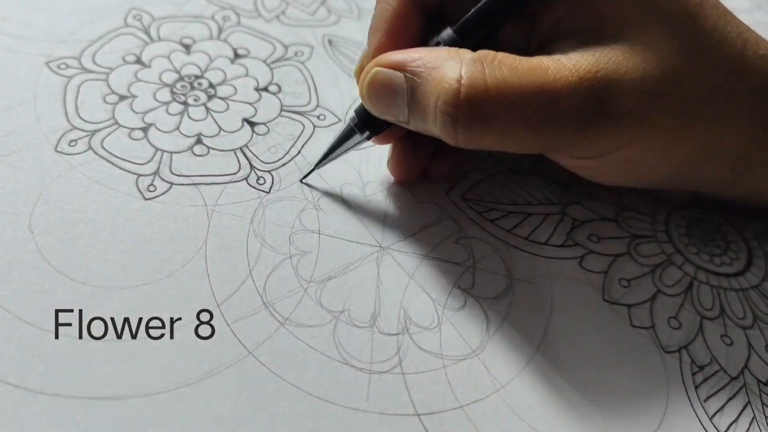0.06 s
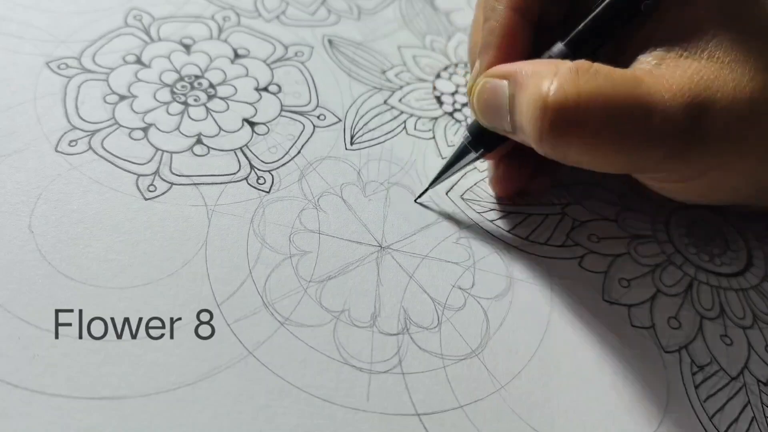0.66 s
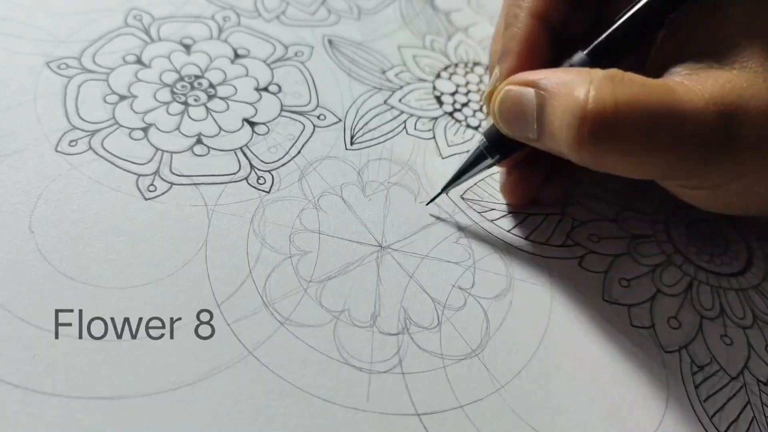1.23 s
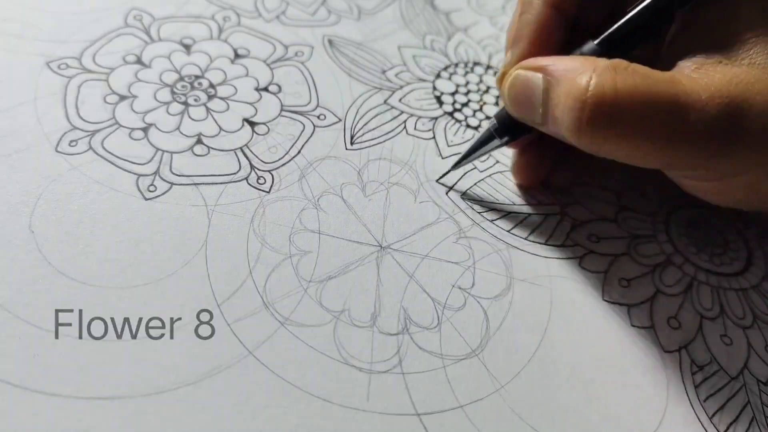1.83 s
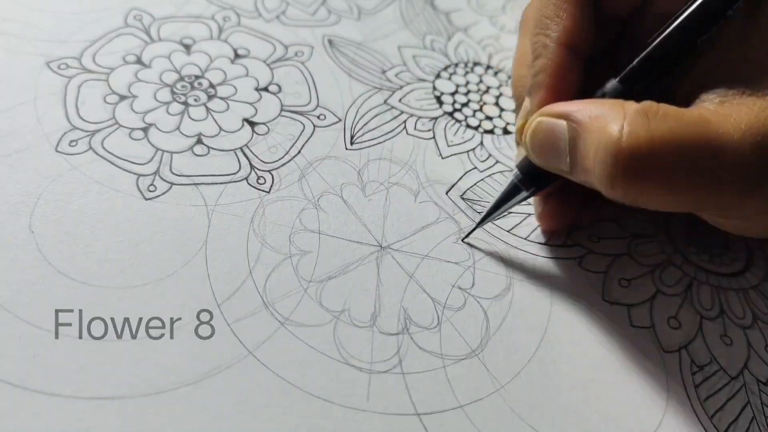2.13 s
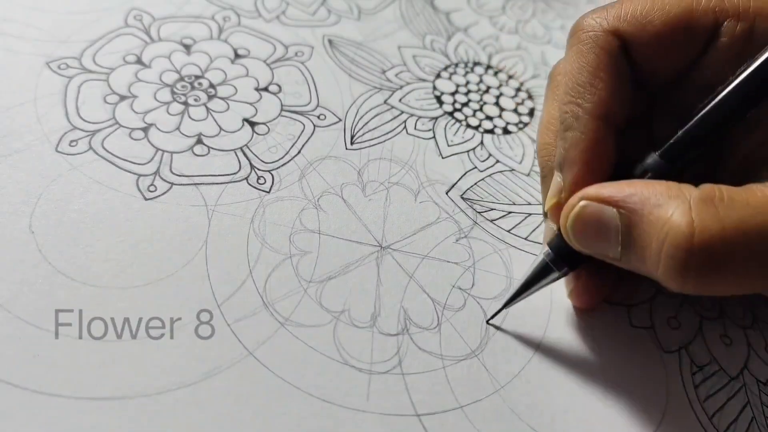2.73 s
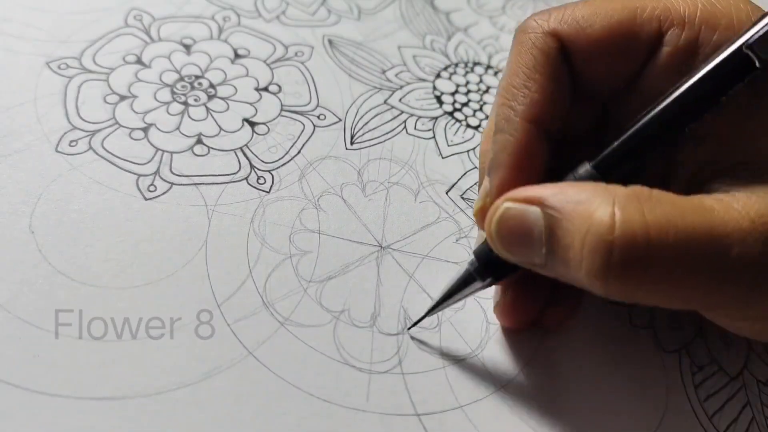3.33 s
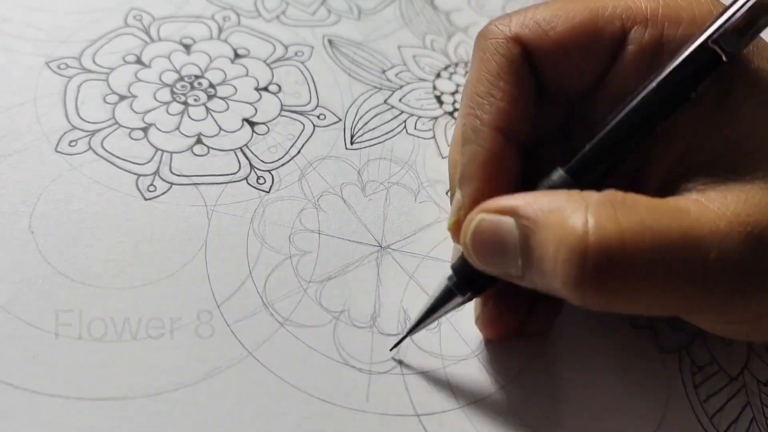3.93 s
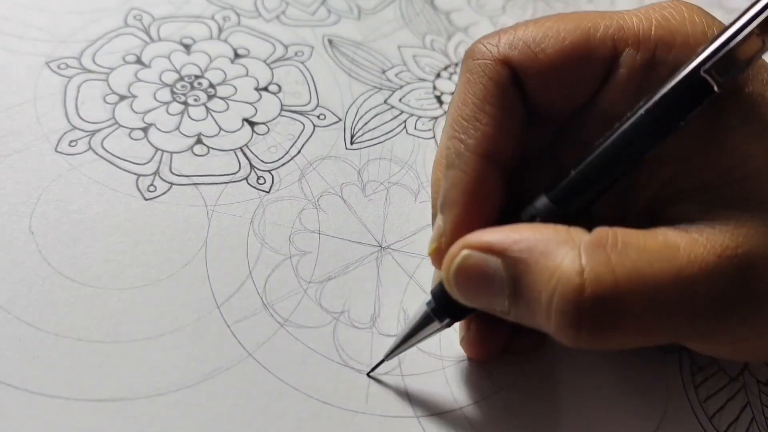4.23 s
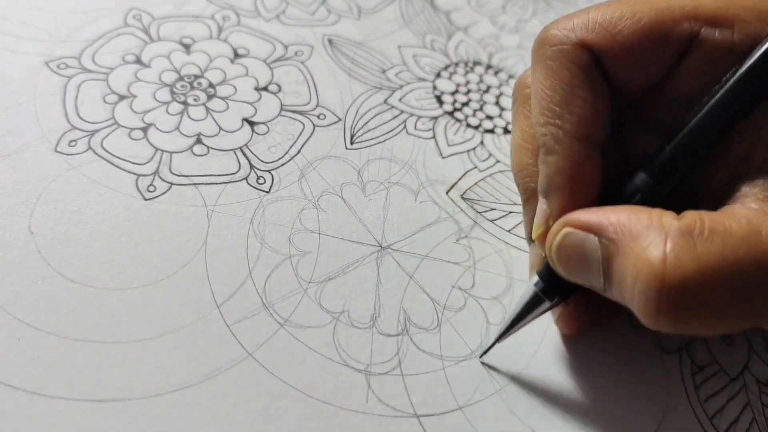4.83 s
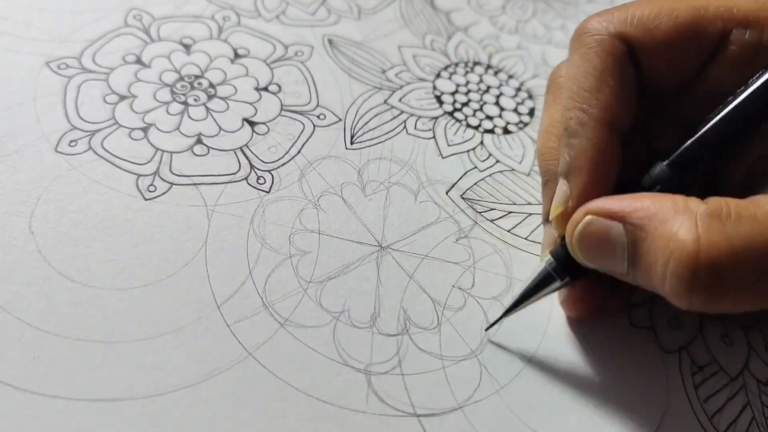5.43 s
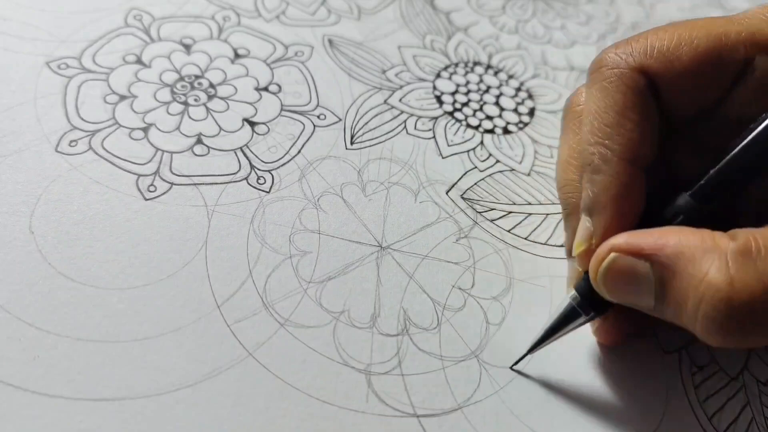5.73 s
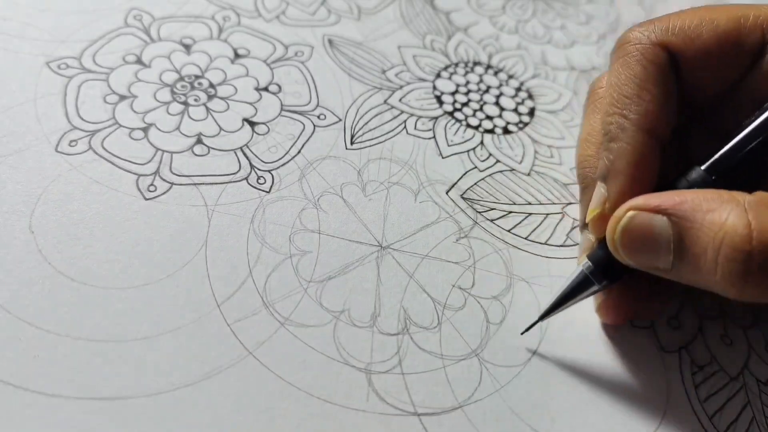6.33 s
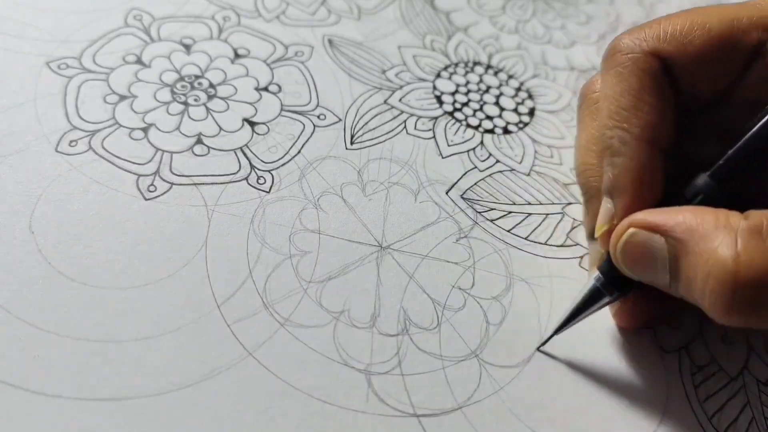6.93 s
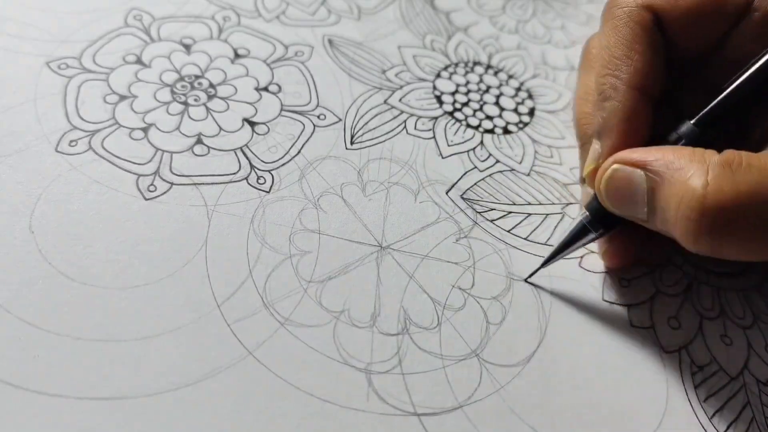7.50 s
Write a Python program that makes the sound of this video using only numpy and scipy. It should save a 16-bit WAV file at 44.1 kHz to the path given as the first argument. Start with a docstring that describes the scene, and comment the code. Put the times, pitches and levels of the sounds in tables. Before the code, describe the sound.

A fine pen scratches short strokes on paper, with soft hand brushes and bumps, over a steady low fan hum.

```python
"""In a small room, close up, a fine pen sketches petal outlines on paper in short, separate strokes.
The tip rasps over the paper's fibres and gives one sharp tick. The hand slides across the sheet,
squeaks faintly, judders once as it sticks and slips, and bumps softly on the pad and the desk below.
Underneath, a fan hums near 100 Hz, with faint room hiss and a thin electrical whine far above."""
import sys
import numpy as np
from scipy import signal
from scipy.fft import rfft, irfft, next_fast_len
from scipy.io import wavfile
from scipy.ndimage import uniform_filter1d, map_coordinates

SR = 44100
rng = np.random.default_rng(int(sys.argv[2]) if len(sys.argv) > 2 else 0)


def persist_wave(psi):
    """Save psi, clipped to +-1, as 16-bit WAV."""
    counts = np.round(np.clip(psi, -1, 1) * 32767).astype(np.int16)
    wavfile.write(sys.argv[1], SR, np.atleast_2d(counts).T)


N = 337806

# The pen strokes. Each row: time of reaching full speed, rise, hold and fall in seconds,
# rasp level in dB, extra bite of the tip in dB.
STROKES = [(0.492, 0.034, 0.017, 0.034, -56.5, 3), (1.455, 0.077, 0.022, 0.042, -56, 1.5),
           (2.665, 0.023, 0.066, 0.034, -55, -1), (3.388, 0.032, 0.012, 0.073, -58, -1.5),
           (3.991, 0.036, 0.016, 0.044, -58.5, 0), (4.989, 0.135, 0.044, 0.033, -64.3, -0.5),
           (5.242, 0.053, 0.012, 0.09, -65, -2), (5.639, 0.095, 0.022, 0.042, -54.2, 0.5),
           (6.029, 0.068, 0.008, 0.065, -63, -1.5), (6.306, 0.069, 0.012, 0.043, -65, -1.5),
           (6.524, 0.035, 0.016, 0.056, -60, 1), (7.142, 0.05, 0.031, 0.089, -64.5, -1.5),
           (7.444, 0.043, 0.008, 0.03, -64, -0.5), (7.528, 0.023, 0.011, 0.031, -60.5, -3)]


def amp(db):
    """Decibels to gain."""
    return 10 ** (np.asarray(db) / 20)


def unit(x):
    """Scale to rms 1."""
    return x / np.sqrt(np.mean(x ** 2) + 1e-20)


def clock():
    """The time of every sample, in seconds."""
    return np.arange(N) / SR


def wobble(rate):
    """A smooth random curve with rate knots a second."""
    knots = rng.standard_normal(int(N * rate / SR) + 4)
    return map_coordinates(knots, [np.arange(N) * rate / SR])


def swell(at, rise, fall, hold=0):
    """Speed of one gesture: 1 during the hold, on bell flanks 10 dB down at rise and fall seconds."""
    age = clock() - at
    away = np.maximum(np.maximum(-age / rise, (age - hold) / fall), 0)
    return amp(-10 * np.minimum(away ** 2, 20))


def filtered(x, response):
    """Filter x by a gain given as a function of frequency in Hz."""
    size = next_fast_len(N + 8192)
    return irfft(rfft(x, size) * response(np.fft.rfftfreq(size, 1 / SR)), size)[..., :N]


def coloured(x, points):
    """EQ x with a curve of (Hz, dB) points on a log frequency axis."""
    freqs, db = np.transpose(points)
    return filtered(x, lambda hz: amp(np.interp(np.log(hz + 1), np.log(freqs), db)))


def patchy(x, depth_db):
    """Make the timbre shimmer with random gain patches, a few hundred Hz wide and some 50 ms long."""
    spectra = signal.stft(x, nperseg=512)[2]
    patches = uniform_filter1d(rng.standard_normal(spectra.shape[1:]), size=3, axis=0)
    patches = uniform_filter1d(patches, size=10, axis=1)
    return signal.istft(spectra * amp(depth_db * unit(patches)), nperseg=512)[1][:, :N]


def narrow_noise(pitch_hz, width_hz):
    """Noise of rms 1 in a narrow band that follows a pitch."""
    phase = 2 * np.pi * np.cumsum(pitch_hz * np.ones(N)) / SR
    return unit(wobble(width_hz) * np.cos(phase) + wobble(width_hz) * np.sin(phase))


def panned(x, left_db):
    """Pan a stereo pair so that the left gains left_db over the right."""
    return x * amp([[left_db / 2], [-left_db / 2]])


def leaning(x):
    """The drawing lies to the left, so the right ear hears less of it, above all in the high treble."""
    # The stereo tilt. Each row: frequency in Hz, left over right in dB.
    tilt = [(700, 4), (1300, 1.5), (2400, 2.5), (4400, 1.5), (8000, 0.5), (10000, 4), (11500, 5),
            (13500, 2.5), (15000, 3)]
    freqs, db = np.transpose(tilt)
    return filtered(x, lambda hz: amp(np.interp(hz, freqs, db) * np.array([[.5], [-.5]])))


def air():
    """Faint room hiss, different at each ear, and a thin electrical whine."""
    # The colour of the hiss. Each row: frequency in Hz, gain in dB.
    hiss_eq = [(200, -42), (380, 9.5), (550, 9.5), (850, 5), (1200, -1), (2000, -6), (4000, -11),
               (6000, -16), (8500, -14.5), (11000, -18.5), (13000, -10.5), (15200, -10.5)]
    noise = patchy(rng.standard_normal((2, N)), depth_db=2.0)
    hiss = unit(coloured(noise, hiss_eq)) * amp(-71 + 0.3 * wobble(11))
    whine = narrow_noise(pitch_hz=15010, width_hz=110) * amp(-89.5)
    return hiss + whine


def fan(base_hz=99.24, lurch_hz=1.9, hum_db=-49.6):
    """A wavering hum that lurches up in pitch, over faint tones and the rumble of moving air, in mono."""
    # Steady tones beside the hum. Each row: pitch in Hz, level in dB.
    faint_tones = [(163, -68.5), (200, -73.5)]
    # The rumble of air in the room. Each row: frequency in Hz, gain in dB.
    rumble_eq = [(20, -16.5), (35, -8.5), (60, -3.5), (82, 3.5), (100, 4), (116, 1), (138, -0.5), (163, 5),
                 (190, -4.5), (215, -6), (238, -5), (268, -9), (305, -6), (450, -18.5), (1000, -57)]
    pitch = base_hz + 1.2 * wobble(3) + 2.1 * wobble(30) + lurch_hz * np.exp(1.1 * wobble(40))
    level_db = hum_db + 0.6 * wobble(16) + 0.6 * wobble(5.4)  # quick waver, slower drift
    hum = np.sqrt(2) * np.sin(2 * np.pi * np.cumsum(pitch) / SR) * amp(level_db)
    tones = sum(np.sqrt(2) * amp(db) * np.sin(2 * np.pi * hz * clock()) for hz, db in faint_tones)
    rumble = unit(coloured(rng.standard_normal(N), rumble_eq)) * amp(-53.0 + 1.07 * wobble(9))
    return hum + tones + rumble


def bumps(pat_t60=0.037, attack_s=0.0016, width_hz=210, thud_hz=185, thud_t60=0.1):
    """Hand and pen bump the pad, which deadens each knock to a dull pat; the desk adds a short thud."""
    # Each row: start in seconds, pat level in dB, pat pitch in Hz, thud level in dB.
    knocks = [(0.172, -56.5, 470, -60), (0.64, -53, 486, -47), (1.225, -58, 480, -58),
              (1.365, -53, 400, -44.5), (1.41, -56.5, 500, -46), (1.628, -54, 498, -49),
              (1.758, -52, 510, -59), (1.967, -54, 450, -46), (2.856, -54.5, 509, -60),
              (2.955, -54.5, 540, -52), (3.078, -56, 400, -45), (3.159, -56, 500, -49),
              (3.18, -58, 400, -44.5), (3.304, -52, 420, -47), (4.178, -58, 484, -51),
              (4.62, -59, 450, -54), (6.217, -59, 439, -51), (6.35, -51, 495, -47.5),
              (6.593, -52, 500, -39.5)]
    out = np.zeros((2, N + SR))
    t = np.arange(SR // 8) / SR
    onset = 1 - np.exp(-t / attack_s)
    hz = np.fft.rfftfreq(len(t), 1 / SR)
    for start, pat_db, pat_hz, thud_db in knocks:
        push = rng.standard_normal(len(t)) + amp(-27) * rng.standard_normal((2, len(t)))  # nearly mono
        pat_band = 1 / (1 + ((hz - pat_hz) / width_hz) ** 4)
        pat = amp(-60 * t / pat_t60) * irfft(rfft(push) * pat_band, len(t))
        desk_hz = thud_hz * np.exp(0.13 * rng.standard_normal())
        thud = amp(-60 * t / thud_t60) * np.sin(2 * np.pi * desk_hz * t)
        bump = amp(pat_db) * pat / np.abs(pat).max() + amp(thud_db) * thud
        out[:, round(start * SR):][:, :len(t)] += onset * bump
    return out[:, :N]


def judder(start_s=4.761, length_s=0.025, slips_per_s=205, peak_db=-42.5):
    """The shifting hand sticks and slips in a quick run, heard through the pad as a low burr."""
    # The pad's response to a slip. Each row: frequency in Hz, gain in dB.
    pad_eq = [(90, -24), (200, 3.5), (450, -7), (700, -17), (1000, -32), (2000, -65)]
    ages = np.arange(.5, length_s * slips_per_s) / slips_per_s
    arch = np.sqrt(np.abs(np.sin(np.pi * ages / length_s)))
    slips = np.zeros(N)
    slips[((start_s + ages) * SR).astype(int)] = arch * amp(rng.standard_normal(len(ages)))
    burr = coloured(slips, pad_eq)
    return amp(peak_db) * burr / np.abs(burr).max()


def squeaks(sag=0.11):
    """Skin squeaks faintly and hoarsely on the sheet; the pitch sags when the movement is slow."""
    # Each row: time of the peak, rise and fall in seconds, top pitch in Hz, level in dB.
    slides = [(5.003, 0.05, 0.046, 1678, -66.3), (5.09, 0.03, 0.04, 1666, -75.5),
              (5.2, 0.0305, 0.04, 1020, -74.5), (5.33, 0.07, 0.05, 1620, -80),
              (6.65, 0.09, 0.13, 1675, -83)]
    out = np.zeros((2, N))
    for at, rise, fall, top_hz, db in slides:
        speed = swell(at, rise, fall)
        pitch = top_hz * (1 - sag * (1 - speed))
        out += amp(db) * speed * np.array([narrow_noise(pitch, width_hz=240) for ear in range(2)])
    return panned(out, left_db=8.0)


def friction(snags_per_s, spread_db, snag_db, tooth_rate, tooth_db):
    """Countless fibres rub, some snag and snap; the paper's tooth makes the contact flutter."""
    # The colour of rasping paper. Each row: frequency in Hz, gain in dB.
    rasp_eq = [(400, -35), (1100, -12), (1650, -3.5), (2200, 2.5), (2650, 1), (3200, -1), (3850, 1),
               (5000, -0.9), (8500, 1.4), (11500, -4.5), (14000, -2.5), (15200, -2)]
    snags = (rng.random(N) < snags_per_s / SR) * amp(spread_db * rng.standard_normal(N))
    snaps = unit(snags * rng.standard_normal((2, N)))
    contact = rng.standard_normal((2, N)) + amp(snag_db) * snaps
    sheet = patchy(contact, depth_db=2.5)  # the sheet's resonances shift as the contact travels
    flutter = amp(tooth_db * wobble(tooth_rate))
    return unit(coloured(sheet * flutter, rasp_eq))


def hand(drag_db=-73, drag_stretch=1.94):
    """The hand brushes the sheet between strokes; its skin adds a duller rub, also as the pen draws."""
    # The hand's glides. Each row: fastest moment, rise and fall in seconds,
    # brush level in dB, skin rub level in dB.
    glides = [(0.1, 0.13, 0.11, -72, -71), (0.447, 0.12, 0.03, -65.5, -71), (0.828, 0.15, 0.056, -75, -75),
              (1.114, 0.2, 0.063, -73, -71.5), (1.36, 0.11, 0.19, -70.5, -72),
              (1.813, 0.22, 0.066, -75.5, -75), (2.029, 0.123, 0.12, -73.5, -75),
              (2.313, 0.13, 0.059, -70.5, -72), (2.51, 0.1, 0.069, -73.5, -71.5),
              (3.042, 0.042, 0.03, -77, -74), (3.186, 0.061, 0.2, -81.5, -75.5),
              (3.51, 0.034, 0.04, -72, -83), (5.481, 0.031, 0.087, -71.5, -72),
              (6.649, 0.027, 0.04, -77, -80), (6.84, 0.045, 0.14, -76, -75)]
    # The colour of skin on paper. Each row: frequency in Hz, gain in dB.
    skin_eq = [(250, -33), (550, 6.5), (1000, 1.5), (1600, -1.5), (2200, -14), (5000, -25.5)]
    brush = friction(snags_per_s=1200, spread_db=2.5, snag_db=-10.5, tooth_rate=42, tooth_db=2.5)
    rub = unit(coloured(rng.standard_normal((2, N)) * amp(2.5 * wobble(45)), skin_eq))
    brushing = [amp(brush_db) * swell(at, rise, fall) for at, rise, fall, brush_db, _ in glides]
    rubbing = [amp(rub_db) * swell(at, rise, fall) for at, rise, fall, _, rub_db in glides]
    dragging = [amp(drag_db) * swell(at, drag_stretch * rise, drag_stretch * fall, hold)
                for at, rise, hold, fall, *_ in STROKES]
    brush *= np.linalg.norm(brushing, axis=0)  # overlapping gestures add in power
    rub *= np.linalg.norm(rubbing + dragging, axis=0)
    return leaning(brush) + panned(rub, left_db=1.0)


def tick(t60=0.011):
    """The hard tip touches down: two bright cracks, so close that they make one tick."""
    # Each row: start in seconds, level in dB ahead of the EQ and pan.
    cracks = [(4.0742, -45.5), (4.0814, -61)]
    # The colour of the tick. Each row: frequency in Hz, gain in dB.
    tick_eq = [(1000, -19), (4000, -20), (6200, -4), (9000, -9), (14500, -8)]
    out = np.zeros((2, N))
    for start, db in cracks:
        age = clock() - start
        envelope = (age >= 0) * amp(db - 60 * np.abs(age) / t60)
        out += envelope * rng.standard_normal((2, N))
    return panned(coloured(out, tick_eq), left_db=18.0)


def pen(bite_hz=3230, bite_octaves=0.97, bite_growth=0.17):
    """Each stroke swells with the tip's speed, from a thin hiss to a fuller bite as the tip digs in."""
    rasp = friction(snags_per_s=2500, spread_db=3.0, snag_db=-8.5, tooth_rate=150, tooth_db=1.17)
    bite = filtered(rasp, lambda hz: np.exp(-(np.log2((hz + 1) / bite_hz) / bite_octaves) ** 2))
    thin_hiss = rasp - bite
    out = np.zeros((2, N))
    for at, rise, hold, fall, db, bite_db in STROKES:
        speed = swell(at, rise, fall, hold)
        out += amp(db) * speed * (thin_hiss + bite * amp(bite_db) * speed ** bite_growth)
    return leaning(out)


def scene():
    """Pen and hand up front, over a bed of fan and room hiss."""
    return pen() + hand() + squeaks() + tick() + bumps() + judder() + fan() + air()


def record(dry):
    """A brick-wall low-pass on the whole mix."""
    cutoff_hz = 15520
    return filtered(dry, lambda hz: 1 / (1 + np.minimum(hz / cutoff_hz, 2) ** 300))


dry = scene()
out = record(dry)
persist_wave(out)
```